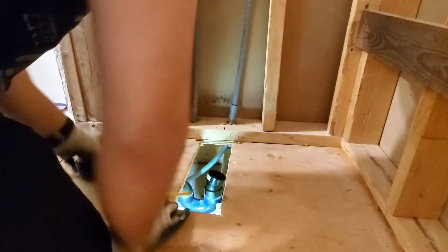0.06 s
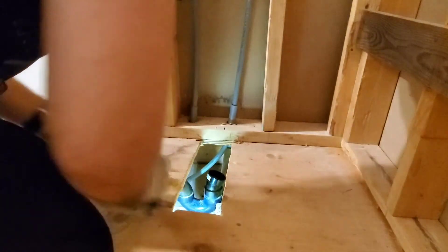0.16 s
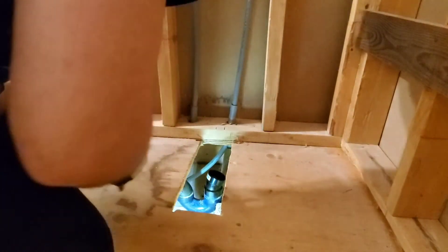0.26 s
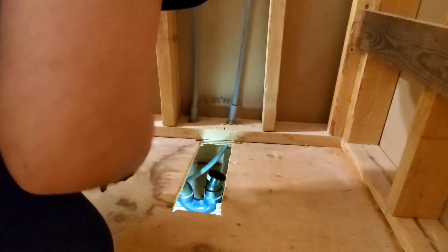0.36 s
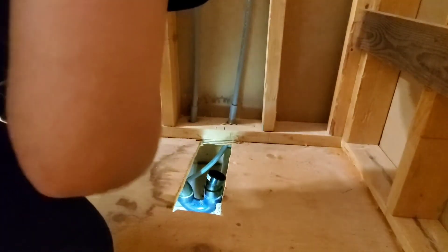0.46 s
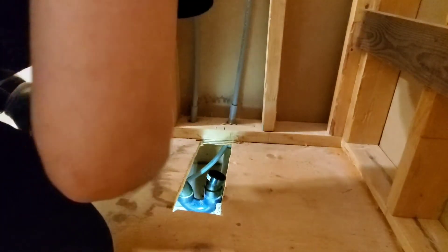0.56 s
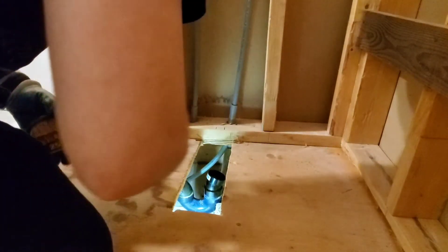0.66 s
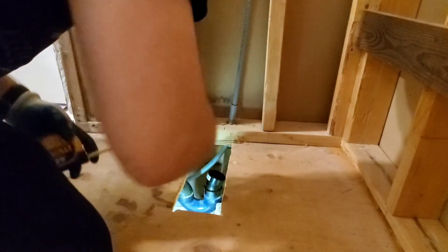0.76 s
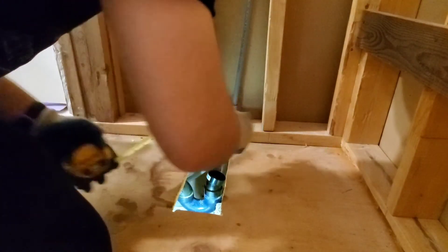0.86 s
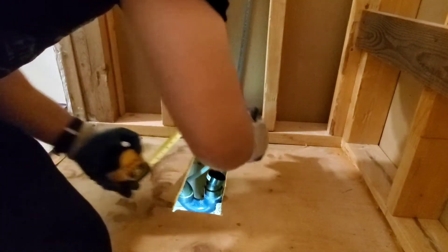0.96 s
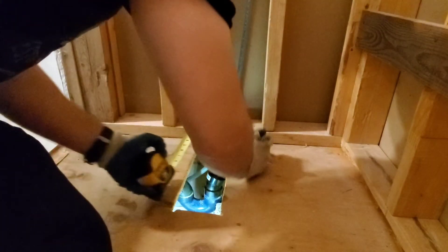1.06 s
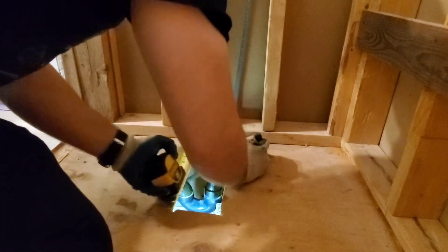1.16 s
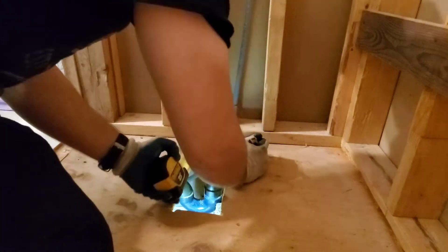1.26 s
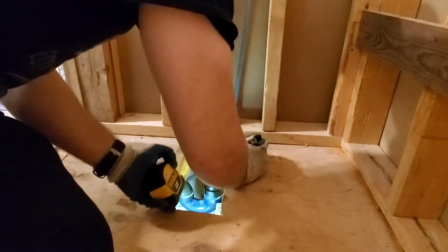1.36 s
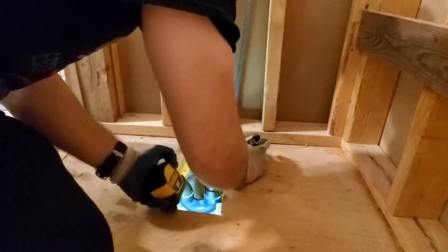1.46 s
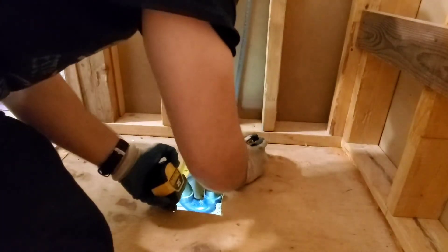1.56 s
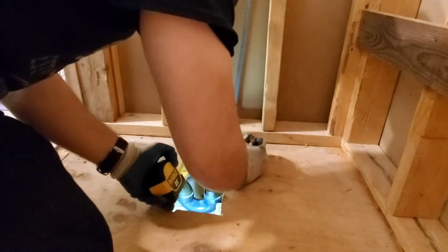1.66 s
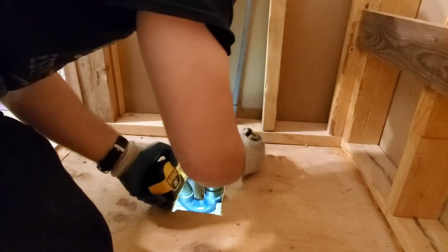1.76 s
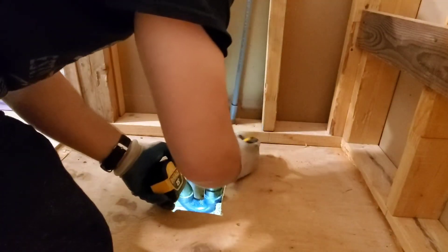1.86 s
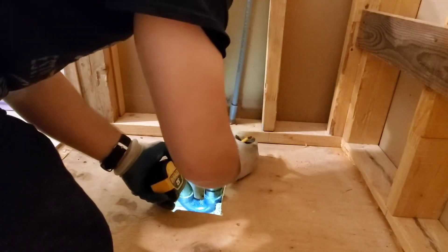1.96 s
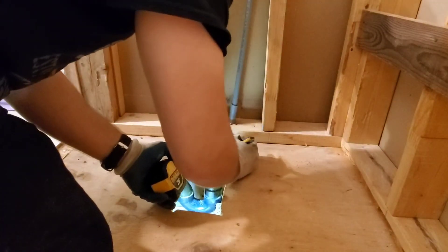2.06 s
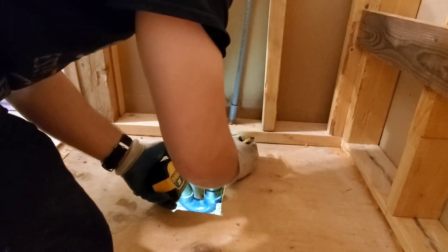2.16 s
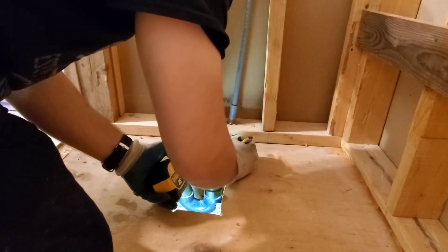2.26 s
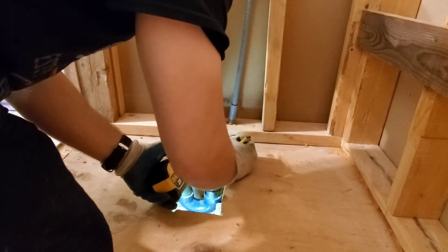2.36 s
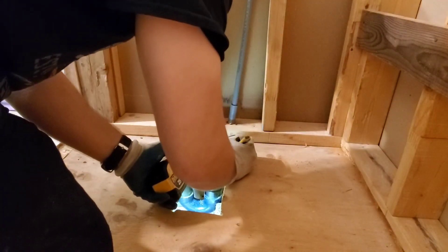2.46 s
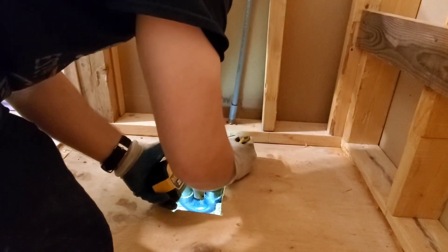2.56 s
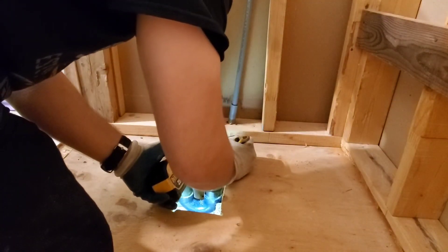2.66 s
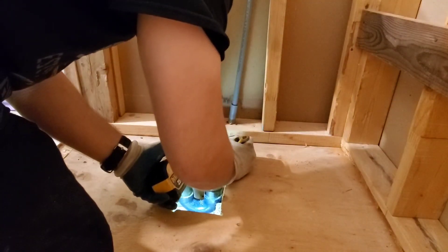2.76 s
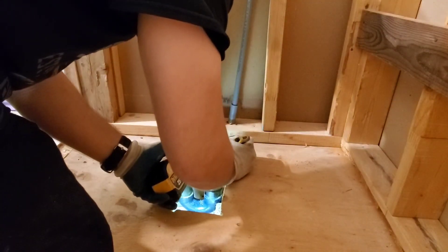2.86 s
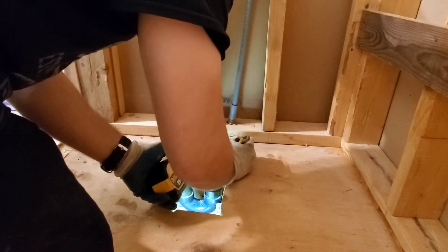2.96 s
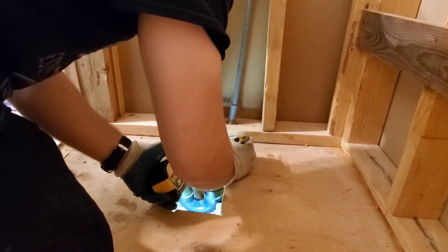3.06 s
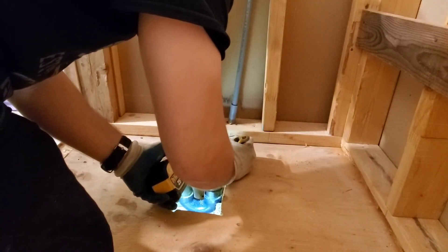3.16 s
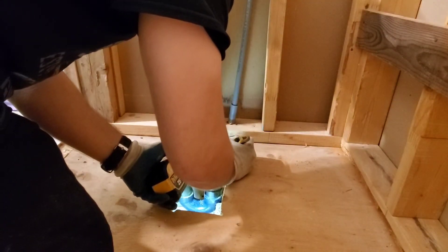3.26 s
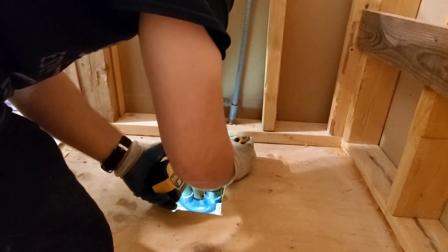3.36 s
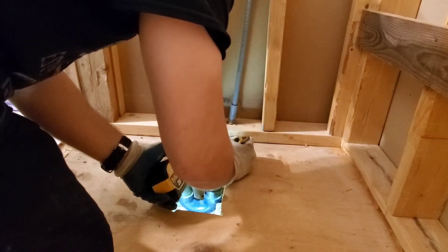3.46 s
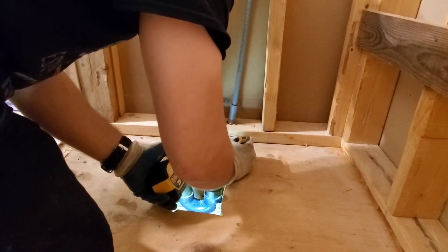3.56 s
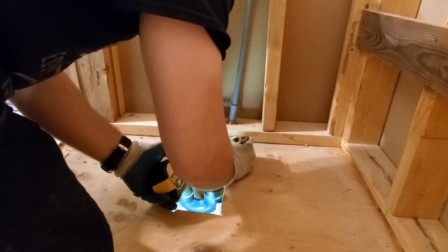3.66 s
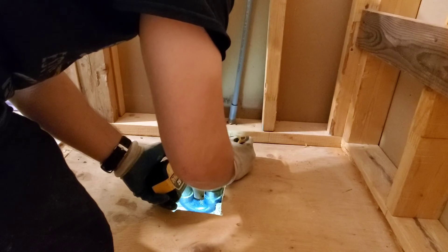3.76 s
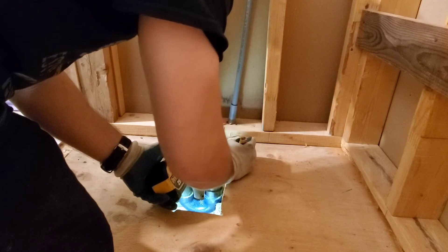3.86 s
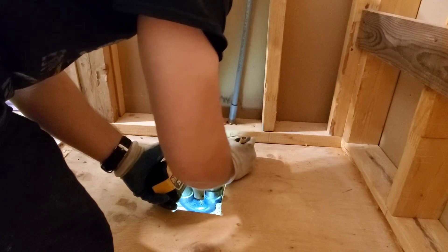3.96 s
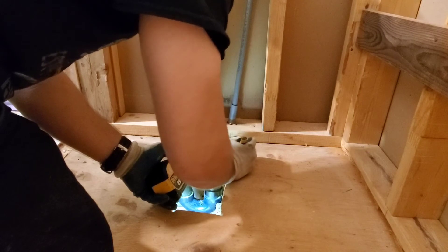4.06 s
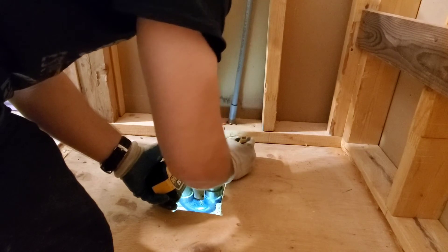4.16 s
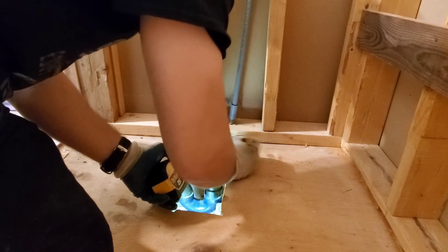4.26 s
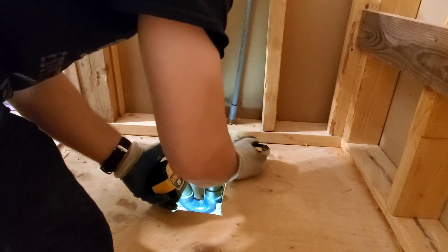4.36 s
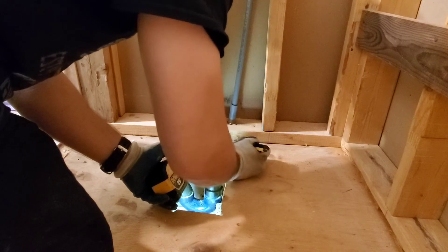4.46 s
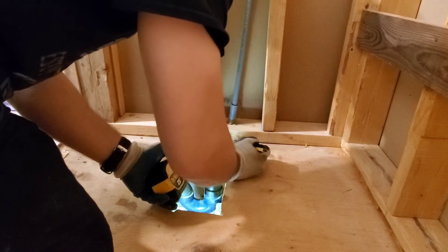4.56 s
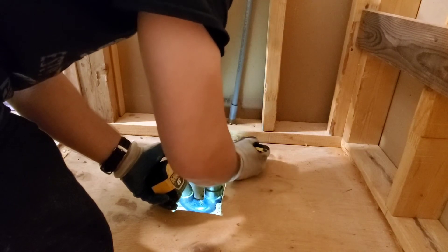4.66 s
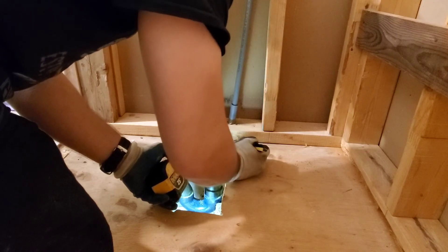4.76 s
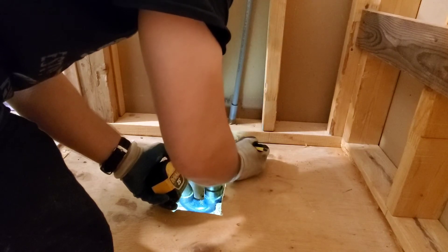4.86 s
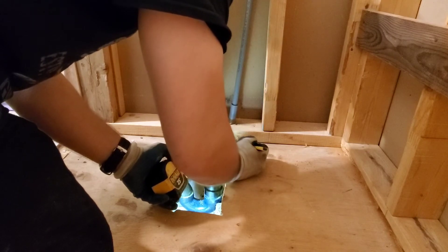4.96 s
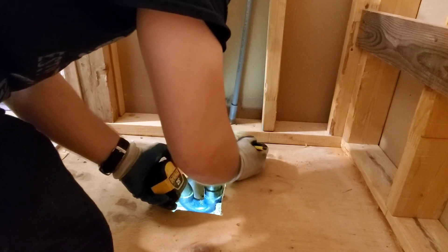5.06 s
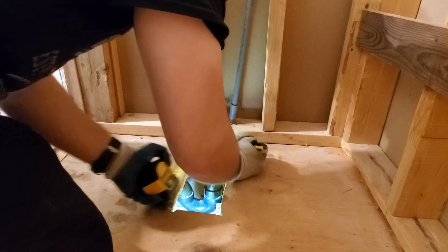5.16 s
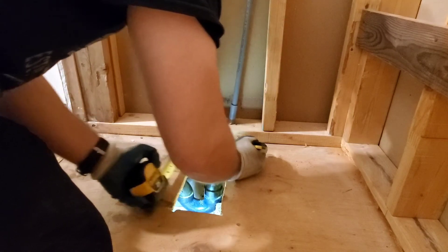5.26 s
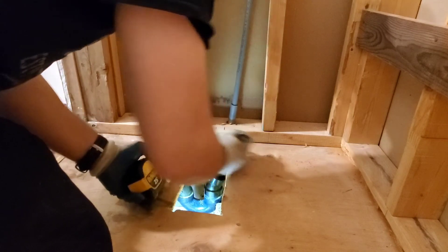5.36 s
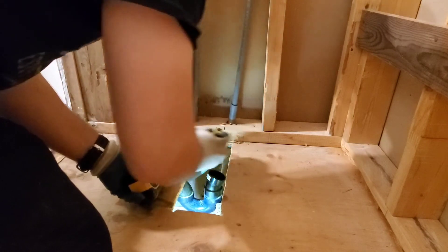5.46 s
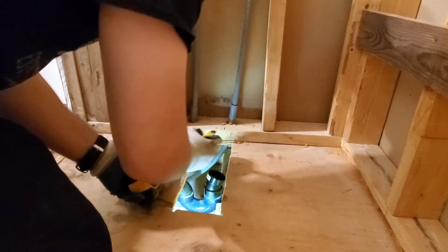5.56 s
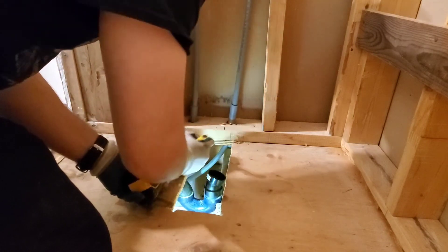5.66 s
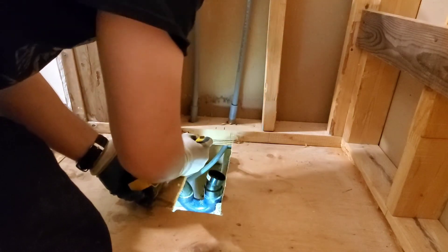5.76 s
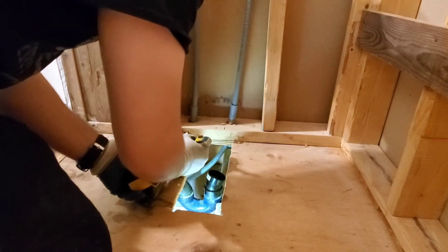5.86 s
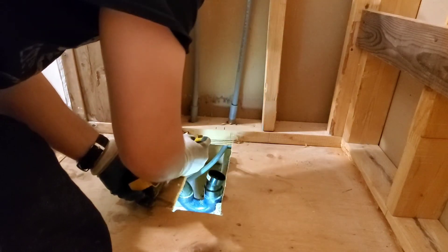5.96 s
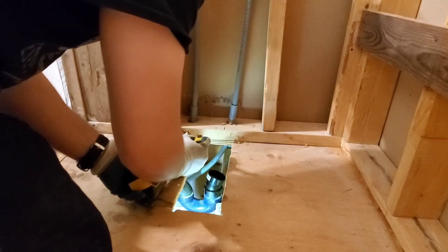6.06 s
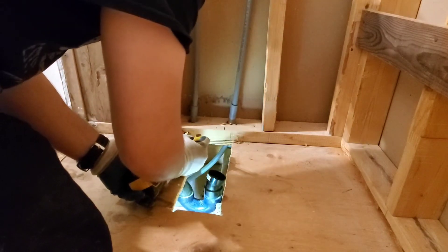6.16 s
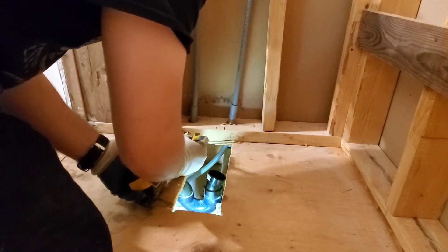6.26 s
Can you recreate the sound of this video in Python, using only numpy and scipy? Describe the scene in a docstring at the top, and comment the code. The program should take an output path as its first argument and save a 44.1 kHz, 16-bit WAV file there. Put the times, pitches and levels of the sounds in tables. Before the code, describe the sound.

Close by in a small room, cloth scrapes across plywood and a tape measure is picked up with a knock. Its steel blade pops, slides out with a hiss and clicks several times against a plastic pipe. Gloves rub faintly on the case during a lull, before the blade retracts with a sharp clack. The boards rumble softly under shifting weight throughout.

```python
"""Someone kneels on a plywood floor in a small framed room and measures a drain pipe with a steel tape.
First the floor rumbles under the shifting weight, sleeves drag, and the case knocks as it is picked up.
The curved blade buckles with a pop, is drawn out with a hiss of friction, clicks, and taps the pipe.
Near four seconds the gloves rub on the case. After five the blade runs back and snaps home,
and the boards go on rumbling softly as the body leans."""
import sys
import numpy as np
from scipy import signal
from scipy.fft import rfft, irfft, next_fast_len
from scipy.io import wavfile

SR = 44100
rng = np.random.default_rng(int(sys.argv[2]) if len(sys.argv) > 2 else 0)


def master_out(mix):
    """Clip the mix to full scale and print it as 16-bit PCM to the path in sys.argv[1]."""
    frames = np.transpose(np.atleast_2d(mix))
    ceiling = np.clip(frames, -1, 1)
    pcm = np.round(ceiling * 32767).astype(np.int16)
    wavfile.write(sys.argv[1], SR, pcm)


N = 278347
TIME = np.arange(N) / SR
RING_TIME = TIME[:SR // 2]   # time axis of one impact or room response

# Noise spectra. Each row: frequency in Hz, relative spectral density in dB.
RUMBLE_SPECTRUM = [(20, -20), (40, -22), (62, -1), (85, 4), (115, -21), (170, -21.5), (300, -41.5)]   # loaded floor
BOARD_SPECTRUM = [(105, -13), (160, 7), (235, -5), (330, -5.5), (520, -15), (820, -11.5), (1250, -28)]   # rustling boards
AIR_SPECTRUM = [(15, -34.5), (25, -21), (58, -4.5), (84, -2), (141, -11.5), (516, -27.5), (796, -26),
                (1520, -34.5), (3340, -37.5), (7710, -50.5), (14800, -38.5), (16000, -43.5)]   # still air of the room
DRAG_SPECTRUM = [(110, -12.5), (160, -2), (230, -14.5), (320, -9.5), (700, -11.5), (950, -19),
                 (2000, -17.5), (3300, -21), (5500, -31), (15000, -30.5)]   # cloth and case on plywood
KNOCK_SPECTRUM = [(130, -18.5), (270, -2), (430, 7), (580, 0.5), (800, 2.5), (1100, 0), (1400, -3),
                  (1650, -6), (2300, -23), (4000, -47)]   # struck pipe and boards
TICK_SPECTRUM = [(2500, -24.5), (5000, 4), (7500, -4.5), (9000, -1), (11500, 5), (15500, 5)]   # struck steel
POP_SPECTRUM = [(250, -28), (450, -5), (900, -7), (1500, -33), (5000, -41)]   # buckling blade
HISS_SPECTRUM = [(1500, -25.5), (4400, -3.5), (5100, -6), (5500, -3.5), (6000, -4.5), (6600, -5),
                 (7400, -11), (8800, -5), (9600, -8), (11400, 0), (13500, -4), (15500, 0)]   # steel in the slot
CASE_SPECTRUM = [(350, -14), (470, 0.5), (670, -3), (1100, -10.5), (1850, -4), (2160, -0.5), (2500, -4.5),
                 (3100, 3), (3650, -1), (4100, -8), (6000, -9.5)]   # case driven by the sliding blade
ZING_SPECTRUM = [(5100, -31), (5470, 4), (5850, -28.5)]   # narrow song of the running blade
GLOVE_SPECTRUM = [(1150, -10), (1650, 0.5), (2080, 3.5), (2900, -6.5), (5000, -8.5), (7400, -14.5),
                  (8700, -7), (10200, -13), (12200, -8), (15800, -14.5)]   # gloves on the case
# The struck case. Each row: multiple of the centre frequency, relative spectral density in dB.
CLACK_SPECTRUM = [(.25, -23), (.5, -12), (.85, 1), (1.2, -2.5), (1.6, -11), (2.3, -16.5)]
# Normal modes. Each row: frequency in Hz, relative level in dB, time to decay by 60 dB in seconds.
FLOOR_MODES = [(63.5, -0.5, 0.64), (76.3, 1.5, 0.27), (133, 0, 0.2), (160.3, -3.5, 0.35),
               (210.3, -12, 0.62)]
PIPE_AND_BOARD_MODES = [(286, 2.5, 0.14), (357, -1.5, 0.4), (420, -2.5, .18), (538, -6, 0.038),
                        (705, -3, 0.17), (810, 1, 0.086), (1050, -7, .24), (1105, -8, .24),
                        (1316, -2.5, .06), (1625, -0.5, .09)]
CASE_MODES = [(1923, 3.5, 0.11), (2304, -8.5, 0.2), (2557, -3, 0.13), (3110, -4, 0.13), (3410, -3, .07),
              (3290, -1, 0.013), (3786, 3, .06), (4500, -0.5, 0.027), (5700, -4, .06)]
BLADE_MODES = [(364.8, -4.5, 0.33), (424, 4.5, 0.2), (483, 5.5, 0.065), (516, -2.5, 0.059),
               (640, -5.5, 0.1), (2162, -15, 0.29)]
# Likeness of the sound at the two ears. Each row: frequency in Hz, correlation coefficient.
EAR_CORRELATION = [(60, 1), (150, .93), (300, 0.73), (600, 0.24), (1200, .05), (16000, 0.15)]
# Decay of the room. Each row: frequency in Hz, reverberation time in seconds.
ROOM_T60 = [(100, 0.077), (400, 0.34), (1500, 0.43), (3000, 0.32), (5500, 0.28), (12000, 0.35),
            (16000, 0.13)]
# The body loads the floor. Each row: peak time and length in seconds, rumble and rustle levels in dB.
LEANS = [(0.0, 0.3, -52.5, -42.5), (0.14, 0.4, -51, -42.5), (0.296, 0.35, -52, -67), (0.7, 0.35, -58, -73),
         (0.98, 0.6, -56.5, -86), (1.604, 0.52, -54, -57), (2.0, 0.63, -56, -63), (2.637, 0.5, -57.5, -73),
         (3.148, 1.5, -63, -74), (3.9, 0.88, -58.5, -65), (4.268, 0.57, -50.5, -58.5),
         (4.604, 0.17, -57, -64), (4.94, 0.37, -54.5, -73), (5.302, 0.61, -58, -56),
         (5.739, 0.087, -57, -47), (5.958, 1.85, -53.5, -65.5), (6.301, 0.13, -50, -55.5)]
# Sleeve and case drag. Each row: start, peak and end in seconds, level in dB.
DRAGS = [(0, 0.196, 0.29, -37.5), (0.28, 0.321, 0.67, -51.5), (0.78, 0.85, 1.22, -46.5),
         (1.429, 1.54, 1.97, -50.5), (2.117, 2.235, 2.4, -69), (5.24, 5.372, 5.4, -51.5)]
# Case and hands strike floor and pipe. Each row: start in seconds, relative thud and knock levels in dB,
# knock tilt in dB per octave, relative clack level in dB, clack centre in Hz, relative tick level in dB,
# softness as a factor on contact time.
BUMPS = [(0.1302, -52, -35, -8, -43, 2950, -66, 0.84), (0.1886, -46.5, -32.5, -1, -33.5, 2520, -44, 1.16),
         (1.1326, -45, -37.5, 3.5, -34, 3122, -35.5, 0.8), (1.467, -39, -52.5, -8, -49.5, 3600, -46, 2.2),
         (1.5528, -36, -35.5, -1.5, -31.5, 4100, -27, 0.8), (2.716, -66.5, -56, -14, -87, 2500, -93, 7.6),
         (5.4024, -35.5, -34, 4, -32.5, 3550, -31.5, 1.5), (5.417, -40, -48, 3.5, -38.5, 3350, -43.5, 1.9),
         (5.476, -45, -52, -4, -50, 3300, -59, 0.85), (5.727, -55.5, -49.5, -6.5, -47, 2220, -67, 4.5)]
# The blade buckles. Each row: start in seconds, relative level in dB.
BUCKLES = [(0.329, -44), (0.372, -47.5), (0.64, -55), (0.806, -37), (0.847, -47)]
# The blade is pulled, fed down and let back. Each row: start, fastest moment and end in seconds,
# relative levels of the hiss and the ringing case in dB.
SLIDES = [(0.612, 0.666, 0.83, -53, -52.5), (0.594, 0.864, 1.038, -34, -34.5),
          (1.165, 1.325, 1.77, -51.5, -54), (1.46, 1.54, 1.62, -63, -44), (1.723, 1.781, 1.942, -50, -49.5),
          (5.146, 5.334, 6, -53.5, -50)]
# The blade clicks. Each row: start in seconds, relative tick and clack levels in dB, softness factor.
CLICKS = [(0.598, -49, -54, 1.1), (0.9429, -48, -46, 0.76), (0.9631, -48.5, -42.5, 1.4),
          (1.0148, -44, -52.5, 0.29), (1.1183, -48.5, -46.5, 2.3), (1.2879, -37, -41, 1.1),
          (1.386, -45, -45, 1.7), (1.5202, -33, -37.5, 3.7), (5.151, -69.5, -57.5, 2.3)]
# The gloves shift their grip. Each row: peak time in seconds, level in dB.
GRIPS = [(3.895, -61), (4.025, -63.5), (4.156, -64), (4.254, -59), (4.37, -65.5)]


def amp(db):
    """Amplitude grows tenfold for every 20 dB."""
    return 10 ** (np.asarray(db) / 20)


def rms_one(x):
    """Division by the rms value gives a signal unit power."""
    return x / np.sqrt(np.mean(x ** 2) + 1e-20)


def unit_energy(x):
    """Division by the root of its energy normalises each channel of a response."""
    return x / np.sqrt(np.sum(x ** 2, axis=-1, keepdims=True))


def at_hz(points, hz):
    """A curve is interpolated on a logarithmic frequency axis."""
    table_hz, values = np.transpose(points)
    return np.interp(np.log(hz), np.log(table_hz), values)


def tilted(rows, slope_db):
    """A harder blow favours high resonances: the spectrum tilts by slope_db per octave."""
    return [(hz, db + slope_db * np.log2(hz / rows[0][0]), *rest) for hz, db, *rest in rows]


def panned(left_db):
    """A level difference between the ears places a source to one side."""
    return amp(np.array([[.5], [-.5]]) * left_db)


def add(out, start_s, sound):
    """Sounds combine by superposition, each from its own starting time."""
    start = max(round(start_s * SR), 0)
    out[:, start:start + sound.shape[1]] += sound[:, :N - start]


def stroke(start, peak, end, db, start_db):
    """The envelope of a movement grows and decays exponentially, with a 20 ms fade at each end."""
    fade = np.clip(1 + np.minimum(TIME - start, end - TIME) / .02, 0, 1)
    return amp(db + np.interp(TIME, [start, peak, end], [start_db, 0, -26])) * fade


def drift(knots_per_s):
    """Interpolation between random values gives a fluctuation of unit power."""
    knots = rng.standard_normal(int(knots_per_s * N / SR) + 2)
    return rms_one(np.interp(TIME * knots_per_s, np.arange(len(knots)), knots))


def stereo_white(size):
    """Interaural correlation: white noise is alike at both ears in the bass, unlike in the treble."""
    mid, side = rfft(rng.standard_normal((2, size)))
    alike = at_hz(EAR_CORRELATION, np.fft.rfftfreq(size, 1 / SR) + 1)
    return irfft(np.sqrt(1 + alike) * mid + np.sqrt(1 - alike) * side * [[1], [-1]], size)


def coloured(x, spectrum):
    """Filtering imposes a spectrum that falls away beyond both its ends; the result has unit power."""
    size = next_fast_len(x.shape[-1])
    hz = np.fft.rfftfreq(size, 1 / SR) + 1
    skirts = np.minimum(hz / spectrum[0][0], 1) * np.minimum(spectrum[-1][0] / hz, 1)
    gain = amp(at_hz(spectrum, hz)) * skirts ** 2
    return rms_one(irfft(rfft(x, size) * gain, size)[:, :x.shape[-1]])


def noise(spectrum, force=1):
    """Source and filter: white noise, scaled by a force, takes on a given spectrum."""
    return coloured(stereo_white(next_fast_len(N))[:, :N] * force, spectrum)


def friction(spectrum, slips_per_s, spread_db, slip_db, judder_db):
    """Stick-slip friction adds tiny uneven slips to a smooth hiss, under a juddering pressure."""
    slipping = rng.random(N) < slips_per_s / SR
    slip_sizes = amp(spread_db * np.minimum(rng.exponential(1, N), 2))
    pressure = amp(judder_db * drift(knots_per_s=70))
    return noise(spectrum, force=(1 + amp(slip_db) * rms_one(slipping * slip_sizes)) * pressure)


def ringing(modes, scatter_db):
    """A struck body vibrates as a sum of damped normal modes, excited differently by each blow."""
    out = 0
    for hz, db, t60 in modes:
        ear_phase = np.arccos(at_hz(EAR_CORRELATION, hz)) * rng.choice([-.5, .5]) * np.array([[1], [-1]])
        decay = amp(db + scatter_db * rng.standard_normal() - 60 * RING_TIME / t60)
        out = out + decay * np.sin(2 * np.pi * hz * RING_TIME + ear_phase) * rng.choice([-1, 1])
    attack = 1 - np.exp(-RING_TIME * modes[0][0] * 2)
    return unit_energy(out * attack)


def crack(spectrum, t60, softness=1):
    """Crowded, heavily damped modes merge into a noise burst; softness stretches its rise and decay."""
    burst = coloured(stereo_white(len(RING_TIME)), spectrum)
    t = RING_TIME / softness
    return unit_energy(burst * amp(-60 * t / t60) * (1 - np.exp(-t / 0.00056)))


def room_response():
    """Diffuse reflections from floor and studs decay exponentially, each band at its own rate."""
    size = len(RING_TIME)
    hz, edges_hz = np.fft.rfftfreq(size, 1 / SR) + 1, np.geomspace(30, 18000, 11)
    spectrum, out = rfft(stereo_white(size)), 0
    for low, high in zip(edges_hz, edges_hz[1:]):
        band = irfft(spectrum * (hz >= low) * (hz < high), size)
        out = out + band * amp(-60 * RING_TIME / at_hz(ROOM_T60, np.sqrt(low * high)))
    onset = np.clip((RING_TIME - .002) / 0.002, 0, 1)
    return unit_energy(out * onset)


def in_room(x, room, wet_db):
    """Convolution adds reflections to the direct sound, at about the same total power."""
    wet = amp(wet_db)
    reflections = signal.fftconvolve(x, room, axes=1)[:, :x.shape[1]]
    return (x + wet * reflections) / np.sqrt(1 + wet ** 2)


def floor_and_air():
    """Loaded plywood rumbles and rustles over the still air; incoherent vibrations add in power."""
    rumble, rustle = amp(-72), amp(-82.5)   # at rest
    for peak, length, rumble_db, rustle_db in LEANS:
        start = peak - .33 * length
        load = stroke(start, peak, start + length, db=0, start_db=-15)
        rumble = np.hypot(rumble, amp(rumble_db) * load)
        rustle = np.hypot(rustle, amp(rustle_db) * load)
    floor = rumble * noise(RUMBLE_SPECTRUM) + rustle * noise(BOARD_SPECTRUM)
    return (floor + amp(-67) * noise(AIR_SPECTRUM)) * panned(left_db=2.5)


def sleeve_and_case_drags():
    """Sliding friction of cloth and case on plywood makes a noise that follows the pressure."""
    pressure = sum(stroke(*row, start_db=-17.5) for row in DRAGS)
    scrape = friction(DRAG_SPECTRUM, slips_per_s=760, spread_db=-1.5, slip_db=-7.5, judder_db=2.5)
    return pressure * scrape * panned(left_db=5.0)


def impact(thud_db, knock_db, slope_db, clack_db, clack_hz, tick_db, softness):
    """One impulse excites coupled bodies: floor thuds, pipe and boards knock, case clacks, steel ticks."""
    room = room_response()   # each spot has its own reflections
    thud = amp(thud_db + 32.5) * ringing(FLOOR_MODES, scatter_db=3.5)
    knock = amp(27.5) * crack(tilted(KNOCK_SPECTRUM, slope_db), t60=0.045, softness=softness)
    knock += amp(26.0) * ringing(tilted(PIPE_AND_BOARD_MODES, slope_db), scatter_db=3.5)
    # the point of impact selects among the modes of the case
    clack_spectrum = [(multiple * clack_hz, db) for multiple, db in CLACK_SPECTRUM]
    struck_modes = [(hz, db + at_hz(clack_spectrum, hz), t60) for hz, db, t60 in CASE_MODES]
    clack = amp(27.5) * crack(clack_spectrum, t60=0.016, softness=softness)
    clack += amp(17.5) * ringing(struck_modes, scatter_db=2.5)
    body = in_room(amp(knock_db) * knock, room, wet_db=0.5)
    body += in_room(amp(clack_db) * clack, room, wet_db=-1.0)
    steel_snap = amp(14.0) * crack(TICK_SPECTRUM, t60=0.016, softness=softness)
    hook_chatter = amp(27.5) * crack(TICK_SPECTRUM, t60=0.027, softness=softness)
    tick = in_room(amp(tick_db) * (steel_snap + hook_chatter), room, wet_db=-2.0)
    return thud + body * panned(left_db=6) + tick * panned(left_db=2.4)


def case_bumps():
    """Case and hands strike floor and pipe, and each impact leaves them in free vibration."""
    out = np.zeros((2, N))
    for start, *blow in BUMPS:
        add(out, start, impact(*blow))
    return out


def blade_buckles():
    """Elastic buckling of the thin curved steel excites its modes in a low, hollow pop."""
    out = np.zeros((2, N))
    for start, db in BUCKLES:
        note = amp(32) * ringing(BLADE_MODES, scatter_db=3.5)
        pop = amp(18.5) * crack(POP_SPECTRUM, t60=0.087)
        add(out, start, amp(db) * (note + pop))
    return out * panned(left_db=4.5)


def blade_slides():
    """Friction in the slot hisses and drives the resonances of the case; at full speed the steel sings."""
    hiss_gain = sum(stroke(*times, db, start_db=-22.5) for *times, db, _ in SLIDES)
    ring_gain = sum(stroke(*times, db, start_db=-16) for *times, _, db in SLIDES)
    scrape = friction(HISS_SPECTRUM, slips_per_s=260, spread_db=3.0, slip_db=-7, judder_db=1.5)
    resonance = friction(CASE_SPECTRUM, slips_per_s=620, spread_db=1, slip_db=-6.0, judder_db=3.0)
    hiss = hiss_gain * amp(-2.0) * scrape
    ring = ring_gain * amp(-5.0) * resonance
    zing = hiss_gain ** 2 / hiss_gain.max() * amp(-14.0) * noise(ZING_SPECTRUM)
    return (hiss + zing) * panned(left_db=1.0) + ring * panned(left_db=6.5)


def blade_clicks():
    """The blade strikes the mouth of the case; the vibration is transmitted faintly to floor and pipe."""
    out = np.zeros((2, N))
    for start, tick_db, clack_db, softness in CLICKS:
        click = impact(thud_db=clack_db - 17.5, knock_db=clack_db - 15, slope_db=3,
                       clack_db=clack_db, clack_hz=3600, tick_db=tick_db, softness=softness)
        add(out, start, click)
    return out


def glove_rubs():
    """Light friction of gloves on the case gives a brief swell of noise at each change of grip."""
    grip = sum(stroke(peak - 0.051, peak, peak + 0.1, db, start_db=-13) for peak, db in GRIPS)
    return grip * noise(GLOVE_SPECTRUM) * panned(left_db=6.5)


def scene():
    """All sources superpose in one small wooden room, whose reflections follow the handling."""
    room = room_response()
    rubbing = in_room(sleeve_and_case_drags() + blade_slides() + glove_rubs(), room, wet_db=-5.5)
    pops = in_room(blade_buckles(), room, wet_db=-8.0)
    return floor_and_air() + rubbing + case_bumps() + pops + blade_clicks()


def record(dry):
    """An elliptic low-pass filter cuts the treble steeply above 16 kHz."""
    return signal.sosfilt(signal.ellip(10, .1, 70, 16000, fs=SR, output="sos"), dry)


dry = scene()
out = record(dry)
master_out(out)
```